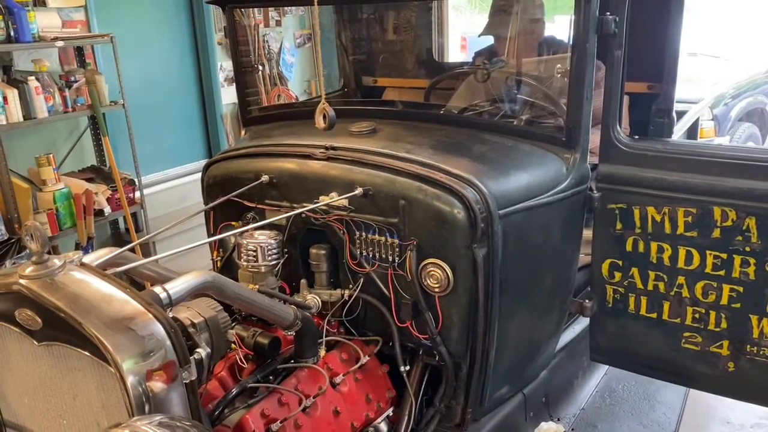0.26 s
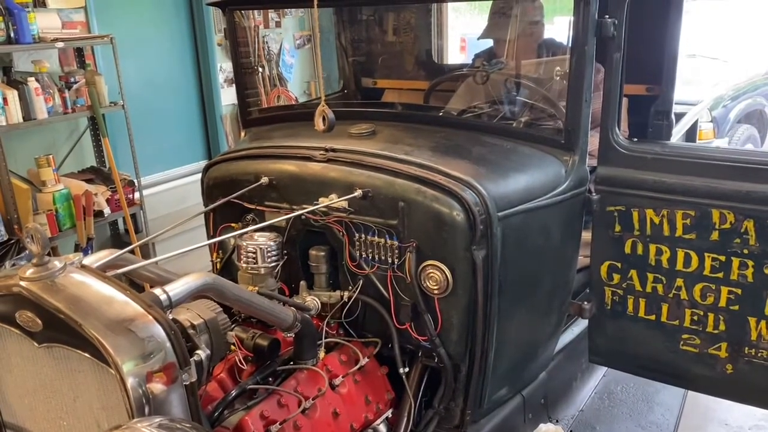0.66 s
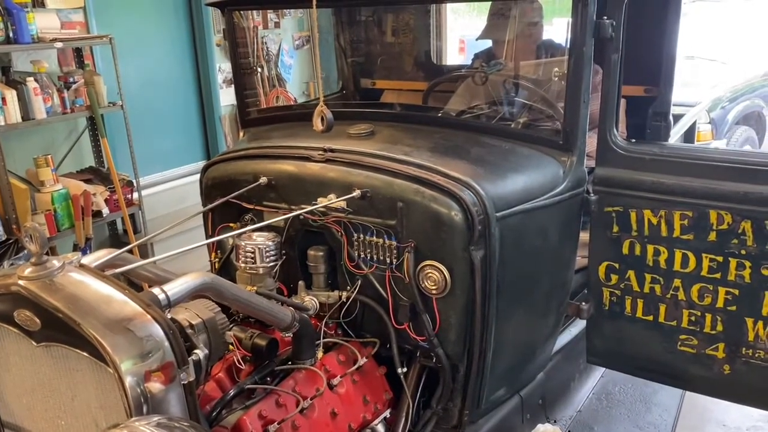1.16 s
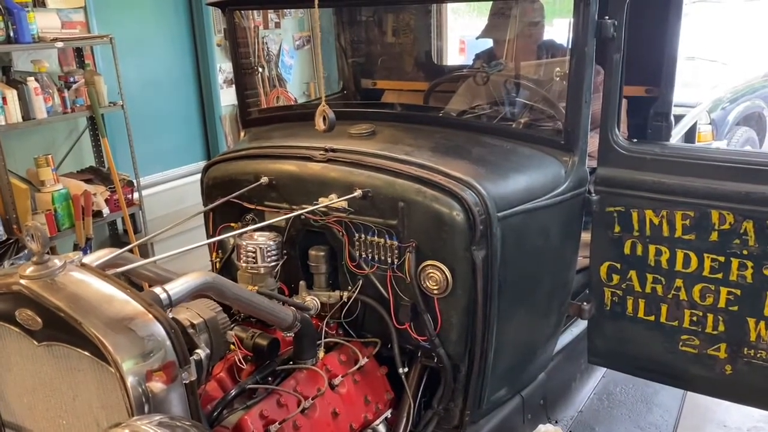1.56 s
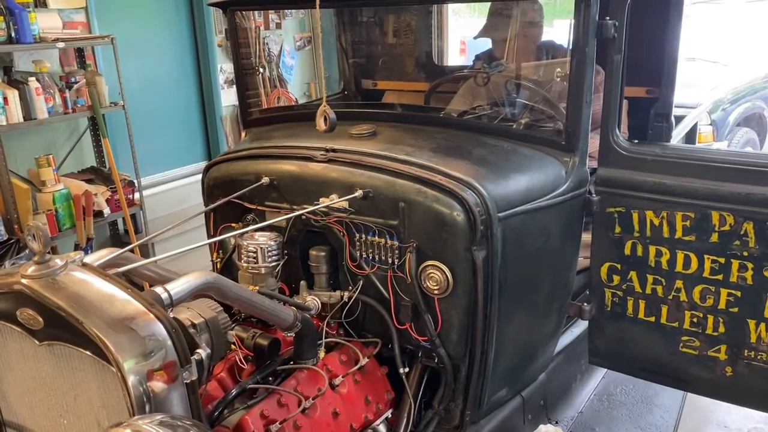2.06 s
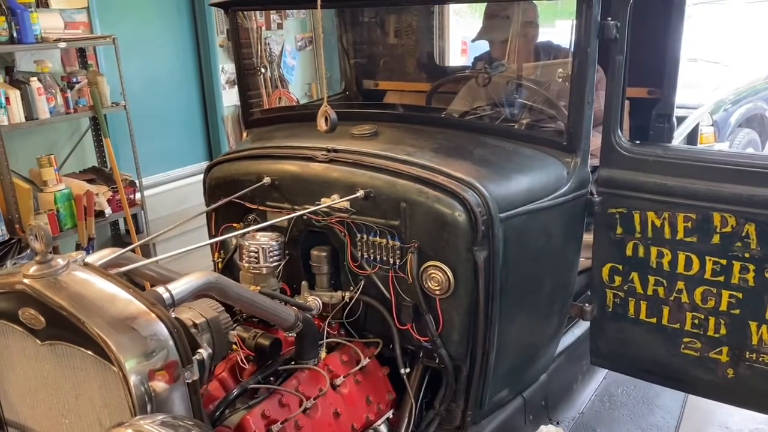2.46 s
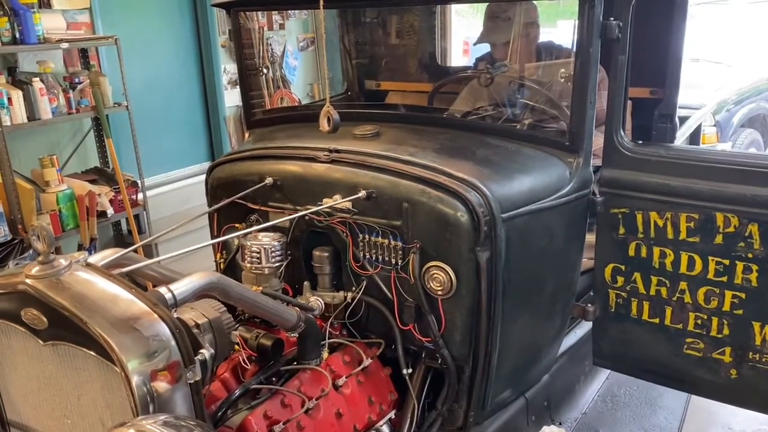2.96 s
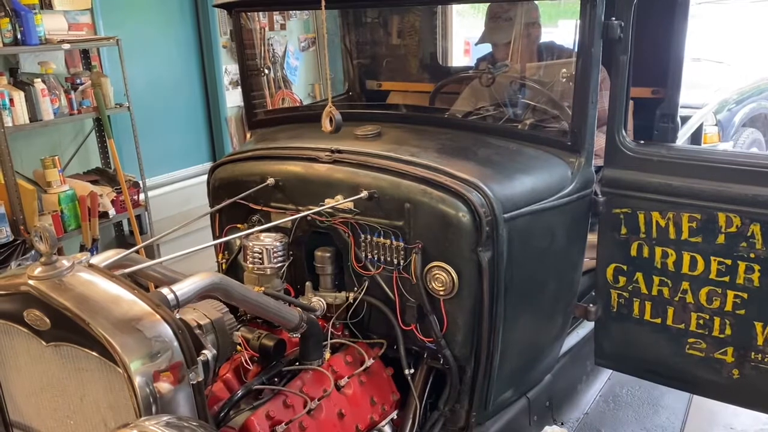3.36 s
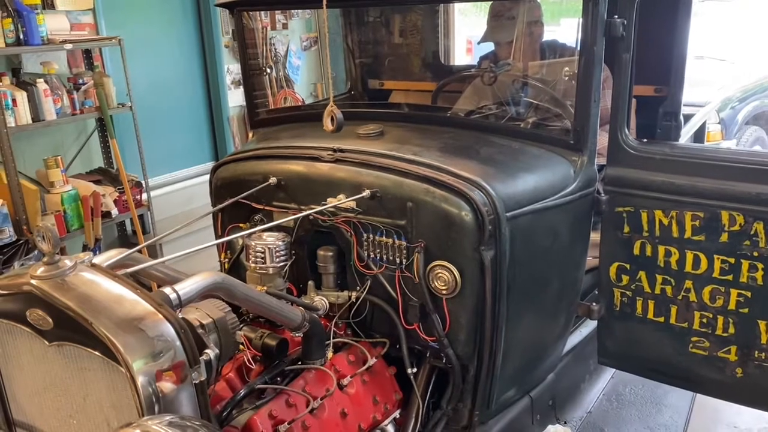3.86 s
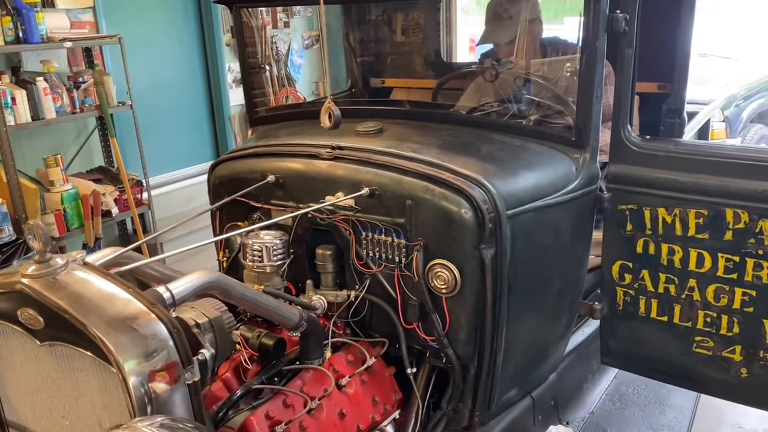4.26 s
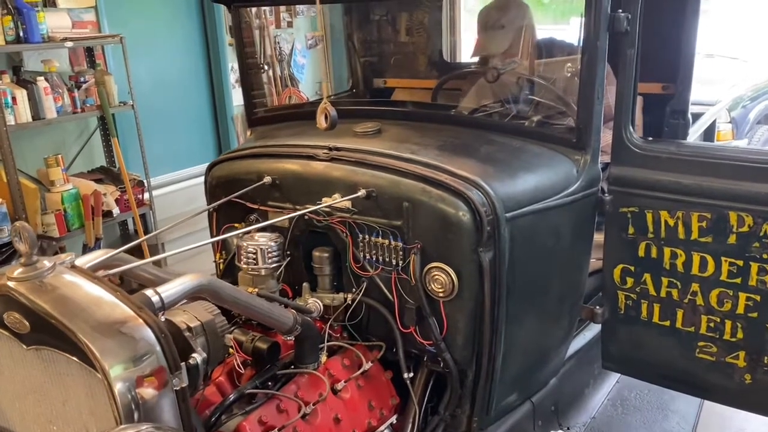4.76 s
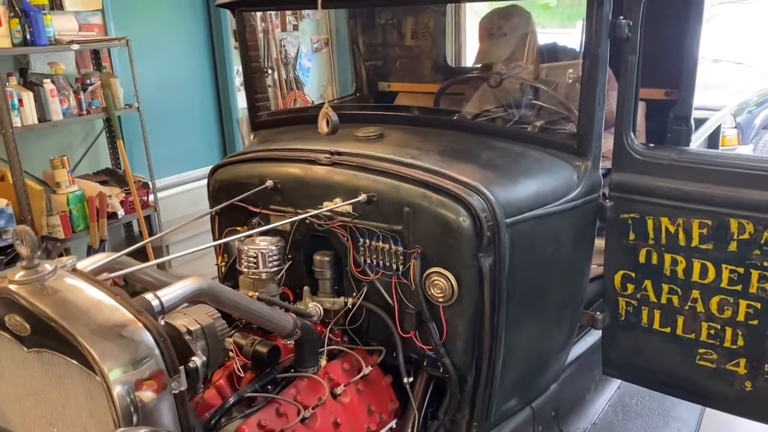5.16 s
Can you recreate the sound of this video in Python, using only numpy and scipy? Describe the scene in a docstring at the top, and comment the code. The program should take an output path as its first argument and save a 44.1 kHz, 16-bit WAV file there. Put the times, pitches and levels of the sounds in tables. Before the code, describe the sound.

A quiet home garage with soft low rumble and a faint steady hum. From about 0.15 to 0.4 s, several tiny, high squeaks slip and fall in pitch. At 0.8 s controls in the old car's cab knock dully, a loose linkage scrapes briefly around 0.9-1.1 s, and a sharper click lands near 1.2 s. At 1.5 s the starter slams in with a metallic clang and grinds, growling, rattling and whining unevenly until nearly 2 s. The cold V8 catches abruptly, spitting sharply through the carburettor, then stumbles and sags until 2.8 s. Two throttle stabs follow, about 2.9 and 3.3 s, the second climbing higher with a full roar, rasp and intake hiss. Exhaust pops burst around 3.4-3.55 s; revs sink unevenly, with more pops near 4.9 s. It ends on a fast, loping idle, booming bass pulses and ticking tappets, close in stereo with short garage echo.

```python
"""A faint squeak comes first, then knocks and a short scrape from the controls in the cab of an old V8.
The starter slams in and grinds on the flywheel: its gear teeth are spikes that ring the metal housing.
The cold engine catches, spits, stumbles and takes two stabs of throttle, the second climbing higher.
Pops follow and it sinks to a fast idle that lopes. Exhaust pulses boom in the home garage and sound a note at
the firing rate; noise pulsing with them roars, rasps and hisses, tappets tick, and a room hum lasts throughout."""
import sys
import numpy as np
from scipy import signal
from scipy.fft import rfft, irfft, next_fast_len
from scipy.io import wavfile
from scipy.ndimage import uniform_filter1d, map_coordinates

SR = 44100
rng = np.random.default_rng(int(sys.argv[2]) if len(sys.argv) > 2 else 0)


def dump_mix(stems):
    """Bounce the given channels to the path in sys.argv[1] as a 16-bit WAV at rate SR."""
    frames = np.atleast_2d(stems).T  # one column per channel
    limited = np.clip(frames, -1, 1)  # hard clip at full scale
    pcm = np.round(limited * 32767).astype(np.int16)
    wavfile.write(sys.argv[1], SR, pcm)


N = 238250
TIME = np.arange(N) / SR  # seconds

# In every spectrum below, gain_db shapes the tone; the overall level is set where it is used.
# Room hum and thin hiss of an appliance
HUM_HZ, HUM_DB, FIZZ_DB = 362, -66.5, -75
# spectrum of the thin hiss: pitch_hz, gain_db
FIZZ_SPECTRUM = [(3900, -38), (4400, -11), (4680, 7), (4900, -16), (5200, -43)]
# spectrum of the quiet room's rumble: pitch_hz, gain_db
RUMBLE_SPECTRUM = [(20, -30), (45, 2.5), (90, 5), (160, -4.5), (270, -5.5), (400, -17), (560, -21.5),
                   (850, -12.5), (1700, -21.5), (3000, -36), (4700, -37), (7000, -72), (16000, -58)]

# knocks of the controls in the cab: start_s, click_db, thud_db, t60_s (time to fall by 60 dB)
CONTROLS = [(0.784, -49.5, -42.5, 0.22), (0.805, -76, -39, 0.43), (0.959, -82, -49.5, 0.63),
            (1.03, -81, -53, 0.27), (1.18, -43.5, -54, 0.19), (1.2, -74.5, -57, 0.79)]
# spectrum of the control clicks: pitch_hz, gain_db
SWITCH_SPECTRUM = [(200, -34), (1000, -10), (3000, -16), (4500, 0.5), (7200, 7), (8500, 2), (11000, -9),
                   (16000, -14)]
# spectrum of the control thuds: pitch_hz, gain_db
THUD_SPECTRUM = [(30, -16), (80, -2), (160, 3), (400, -4), (1000, -11), (3000, -16.5), (9000, -40.5)]
# spectrum of the sliding linkage: pitch_hz, gain_db
SLIDE_SPECTRUM = [(500, -6), (1100, -5), (1800, -5), (2500, 4), (3500, -10), (5000, -15), (9000, -37)]
SLIDE_S, SLIDE_RISE_S, SLIDE_HOLD_S, SLIDE_FALL_S, SLIDE_DB = 0.9, 0.035, 0.079, 0.074, -60

# slips of the squeak: start_s, pitch_hz (at the start), level_db (before a trim), t60_s
SQUEAKS = [(0.15, 2130, -68, .18), (0.183, 2270, -59, 0.12), (0.281, 2254, -61, .12),
           (0.358, 2274, -53.5, 0.1), (0.395, 2230, -66, 0.22)]
SQUEAK_SAG_HZ, SQUEAK_SAG_S = 70, 0.03  # how far each slip falls in pitch, and the time constant

# the starter, slowed by each compression: time_s, tooth_rate_hz, growl_db, rattle_db, whine_db
CRANKING = [(1.487, 624, -27, -27, -42), (1.525, 720, -23.5, -29, -34), (1.545, 884, -15.5, -35, -18),
            (1.585, 860, -20, -27, -33), (1.62, 920, -20.5, -24.5, -20), (1.668, 915, -22.5, -18.5, -40),
            (1.703, 830, -18, -33, -49), (1.725, 880, -23.5, -23, -22), (1.792, 955, -17.5, -24, -27),
            (1.815, 970, -21.5, -24.5, -43), (1.86, 830, -23.5, -27.5, -17), (1.882, 840, -28, -32, -35),
            (1.98, 800, -55, -62, -56)]
# pinion blows on the flywheel: start_s, peak_db, clang_db and thump_db (against the peak, before trims)
PINION = [(1.486, -20.5, -10, -2), (1.532, -23, 16, -0.5), (1.721, -21.5, -3, -22), (1.759, -26, 8, -25),
          (1.854, -31, 14, -18)]
# whine partials: multiple of the tooth rate, level_db (against the whine)
GEAR_WHINE = [(1, 4), (2, -10), (3, -20)]
# partials under load: multiple of a quarter of the tooth rate, level_db
GROWL_TONES = [(2, -3), (3, -0.5), (4, -6), (6, -2.5)]
# partials off load: multiple of a quarter of the tooth rate, level_db
RATTLE_TONES = [(6, -4), (7, -5), (8, -2), (9, 0), (10, -11), (11, -11)]
TEETH_PER_ORDER = 4
# spectrum of the gears grinding under load: pitch_hz, gain_db
GRIND_SPECTRUM = [(100, -18), (200, -7.5), (350, -23), (470, -8), (680, -4), (900, -12.5), (1100, -4.5),
                  (1800, -14.5), (2400, -20), (3900, -39), (8000, -42), (10000, -69)]
# spectrum of the gears rattling off load: pitch_hz, gain_db
RATTLE_SPECTRUM = [(600, -40), (1100, -7), (1350, -3), (1750, 8.5), (2100, 1.5), (2500, 1), (3600, -2),
                   (4300, -27), (7500, -29), (10000, -39)]
# spectrum of the pinion's clang: pitch_hz, gain_db
CLANG_SPECTRUM = [(100, -21), (220, -2.5), (450, -1.5), (680, 4), (860, 2), (1080, -10.5), (1330, -2),
                  (1900, -10.5), (2400, -11.5), (3900, -26.5), (8000, -18.5), (10000, -67)]
# spectrum of the pinion's sharp crack: pitch_hz, gain_db
CRACK_SPECTRUM = [(200, -14), (1000, 3), (3500, 3), (7000, 0.5), (10000, -2), (16000, -3.5)]
# ringing modes of the starter housing: pitch_hz, lift_db (scaled by the filter's depth)
HOUSING = [(306, 4), (353, 10), (456, 13), (580, 1.6667), (638, 11), (676, 7.5), (855, 12), (911, 3),
           (942, 13.6), (993, 7.3), (1274, 13), (1537, 3.3), (1640, 14.7), (1807, 13), (1960, 4),
           (2052, 9.1), (2270, 5), (2409, 9.7), (2868, 4)]

# carburettor spits: start_s, peak_db (before a trim)
SPITS = [(1.9121, -23.5), (1.9604, -21.5), (1.985, -24), (2.085, -17), (2.1246, -20.5)]
# spectrum of a spit: pitch_hz, gain_db
SPIT_SPECTRUM = [(1500, -36), (4000, -11), (5000, 2.5), (7500, -2), (10000, -17), (16000, -13)]
# exhaust pops: start_s, level_db, t60_s
POPS = [(2.985, -43, 0.18), (3.075, -27, 0.19), (3.411, -20, 0.088), (3.484, -16.5, 0.18),
        (3.546, -12.5, 0.23), (4.253, -44, 0.17), (4.878, -19, 0.2), (4.908, -24.5, 0.32)]
# spectrum of a pop, also used for soft bumps and thumps: pitch_hz, gain_db
POP_SPECTRUM = [(100, -12), (240, 1), (450, 4), (900, -9), (1400, -21), (5000, -44)]
# spectrum of a pop's sharp front: pitch_hz, gain_db
POP_FRONT = [(150, -25), (450, 0), (680, -2.5), (860, 1), (1100, -8), (2000, -25), (5000, -55)]
FRONT_DB, FRONT_T60_S = -5, 0.09  # the front's level against the pop, and its length

# crankshaft speed: time_s, firing_rate_hz
SPEED = [(1.5, 18), (1.8, 44), (1.95, 70), (2.08, 72), (2.2, 62), (2.38, 67), (2.56, 52), (2.72, 48),
         (2.86, 49), (3.0, 66), (3.16, 88), (3.33, 92), (3.45, 97), (3.6, 103), (3.72, 97), (3.8, 95),
         (4.05, 91), (4.35, 79), (4.6, 74.5), (4.82, 72.5), (5.0, 68), (5.4, 67.5)]
# pedal movements that together shape two stabs of throttle: start_s, rise_s, hold_s, opening (0-1)
THROTTLE = [(2.852, 0.12, 0.1, 0.6), (3.092, 0.046, 0.069, 0.3), (3.274, 0.16, 0.083, 0.77),
            (3.442, 0.051, .04, 0.72)]
# extra strength of each pulse, in firing order: strength (scaled by pattern and unevenness)
CYLINDERS = [0.1, -0.38, 0.052, -0.05, -0.53, -0.17, 0.083, -0.83]
# missed or changed firings: time_s, drop_db (negative is a lift; scaled by each sound's share)
MISSES = [(1.973, 12), (2.03, 12), (2.1, 12), (2.222, 2), (2.29, 5), (2.405, 6), (2.475, -4), (2.64, 3),
          (2.773, 6), (2.82, 6)]
MISS_S = 0.016  # half width of each such change
CLOSE_S = 0.2  # time constant of the closing throttle
IDLE_RATE = 71.6  # firings a second at which the level laws add nothing for speed
CRANK_S, CATCH_S, CATCH_RISE_DB = 1.487, 2.01, 11  # starter engages, engine catches, exhaust build-up
UNEVEN, OVERRUN_UNEVEN, OVERRUN_S = 0.44, 0.35, 0.91  # spread; extra once the pedal lifts; time constant
SETTLE_S = 4.5  # the idle begins to lope
BOOM_LOPE, BARK_LOPE = (5.45, 1.7), (5.335, 2.9)  # time_s of a weak moment, swing_db either way

# level law of the tappets: idle_db, full_throttle_added_db, added_db per doubling of speed
CLATTER_LAW = (-37.5, 4.5, 5.4)
# ringing of the valve gear and its covers: pitch_hz, level_db (against each other)
VALVE_MODES = [(1637, -47), (1900, -52.5), (2632, -51), (3079, -59), (3359, -52.5), (4883, -53),
               (5141, -68), (5674, -73), (6810, -62)]
# spectrum of a tappet's contact: pitch_hz, gain_db
TICK_SPECTRUM = [(700, -30), (1600, 7.5), (2600, -2), (3400, 3), (5000, -3), (7500, -7.5), (16000, -11)]
CLATTER_T60_S = 0.063  # how long each tick rings
TICK_DB, TICK_T60_S = 1, 0.013  # the dry contact's level against the ringing, and its length

# level law of the roar: idle_db, full_throttle_added_db, added_db per doubling of speed
ROAR_LAW = (-37, 17.8, 2.1)
# level law of the rasp: idle_db, full_throttle_added_db, added_db per doubling of speed
RASP_LAW = (-32, 9.1, 3.3)
# level law of the hiss: idle_db, full_throttle_added_db, added_db per doubling of speed
HISS_LAW = (-35.5, 12.6, 3.2)
# spectrum of the roar: pitch_hz, gain_db
ROAR_SPECTRUM = [(120, -65), (260, -2), (325, 2.5), (400, -1), (460, 0), (540, -6.5), (680, -3.5),
                 (800, -11.5), (1100, -11.5), (3000, -83.5)]
# spectrum of the combustion rasp: pitch_hz, gain_db
RASP_SPECTRUM = [(300, -41), (600, 0.5), (850, 3), (1100, 4), (1600, 5.5), (2100, 2.5), (2700, -1.5),
                 (3500, -1.5), (5000, -10), (16000, -58)]
# spectrum of the intake hiss: pitch_hz, gain_db
HISS_SPECTRUM = [(1200, -11), (2800, -12.5), (3500, -5.5), (4000, -5), (4700, 3), (5700, 0.5), (7300, 1.5),
                 (9000, -0.5), (12000, -5), (16000, -9)]
# modes of the room and engine bay: pitch_hz, lift_db (scaled by the filter's depth)
GARAGE_MODES = [(139, 1), (197, 1), (242, 10), (284, 3), (322, 3.5), (375, 1), (394, -4.5), (454, 5.5),
                (515, 7.5), (557, -2.5), (579, 4), (623, -4), (720, 0.5), (738, 0.5), (857, 9.5), (938, 7),
                (1015, 5.5), (1052, -16), (1284, -10), (1642, 36)]
COLD_DB, WARM_S = 9, 2.55  # extra roar of the first, rich firings, and the time it takes to fade
CHOKE_DB, CHOKE_OFF_S, CHOKE_FADE_S = 1, 3.5, 0.21  # the choked carburettor sucks louder at first

# clean notes of the exhaust: time_s, firing_note_db, stutter_note_db
DRONE = [(1.83, -47, -60), (1.94, -17, -40), (2.04, -16, -37), (2.12, -32, -27), (2.18, -31, -15),
         (2.26, -20, -24), (2.35, -16, -35), (2.46, -24, -45), (2.62, -22, -50), (2.86, -18.5, -50),
         (2.99, -14, -45), (3.09, -24, -30), (3.18, -13.5, -35), (3.32, -16, -35), (3.45, -15.5, -32),
         (3.5, -25, -23), (3.6, -30, -15), (3.7, -27, -16.5), (3.9, -29, -28), (4.1, -22.5, -24),
         (4.28, -33, -34), (4.52, -29, -32), (4.62, -17, -36), (4.81, -17.5, -37), (4.88, -27.5, -40),
         (5.05, -23.5, -40), (5.39, -22, -40)]
STUTTER_ORDER = 3 / 4  # pitch of the stutter note against the firing rate
# exhaust pulses: time_s, boom_db and bark_db (before small trims), boom_unevenness (0-1)
EXHAUST = [(1.8, -24, -40, .5), (1.84, -26, -42, 0.54), (1.93, -14.5, -23, 0.44), (2.06, -20, -23.5, 0.53),
           (2.17, -16, -23.5, 0.48), (2.33, -16, -23.5, 0.46), (2.54, -21, -32, 0.55),
           (2.72, -15, -27, 0.55), (2.84, -18, -22, 0.8), (2.9, -24, -26.5, .4), (2.97, -22, -16.5, 0.46),
           (3.12, -11, -15, 0.53), (3.24, -19, -16.5, .4), (3.42, -21.5, -15, 0.47), (3.6, -20, -15, 0.65),
           (3.72, -14.5, -24.5, 0.86), (4.0, -24, -20, 0.5), (4.45, -18, -22, 0.8),
           (4.62, -22.5, -24, 0.77), (4.8, -23, -24.5, 0.6), (4.86, -22, -19.5, 0.7),
           (5.0, -23.5, -24.5, 0.57), (5.38, -22, -25.5, 0.57)]
# spectrum of the boom: pitch_hz, gain_db
BOOM_SPECTRUM = [(20, -41.5), (33, -23), (44, 3.5), (57, 2.5), (72, 6), (95, 2), (115, -7), (140, -4),
                 (175, -15), (400, -100)]
# standing waves between the walls: pitch_hz, lift_db
STANDING = [(47, 7.5), (74, 3.5)]
# spectrum of the bark: pitch_hz, gain_db
BARK_SPECTRUM = [(50, -83), (95, -5.5), (122, 1), (145, 7.5), (172, 0.5), (198, 3), (260, 2), (300, -2),
                 (335, -3.5), (390, -11.5), (600, -18), (1200, -61), (4000, -43)]
# narrow resonances of pipes and room: pitch_hz, lift_db
PIPES = [(139, 1.5), (197, 7.5), (242, 8.5), (282, 7), (322, 4), (339, 4.5), (454, 8.5), (557, -1)]

# length of the garage's echo: pitch_hz, t60_s
ECHO = [(100, 0.56), (500, 0.5), (3000, 0.68), (8000, 0.11), (16000, 0.13)]
# reflections at the sides: pitch_hz, side_db
WIDTH = [(40, -23.5), (80, -15.5), (170, -15), (350, -10), (700, -6.5), (1300, -2), (2600, -6.5),
         (5200, -5), (7000, -11), (16000, -101)]
# left against right level: pitch_hz, difference_db
LEFT_RIGHT = [(60, 0.5), (110, 0.5), (200, -2), (380, -1.5), (700, 0.5), (1290, -1.5), (2380, 1.5),
              (4400, 3), (8120, 0), (15000, 0)]
# how far the left channel's phase leads: pitch_hz, lead in half cycles
LEFT_LEAD = [(700, 0), (1400, .33), (1850, .35), (2100, 0), (3200, .12), (5200, .1), (6000, 0), (7500, 0),
             (8400, -1), (9600, -1), (10400, -2), (11800, -2), (12500, -3), (13900, -3), (14600, -4)]
TOP_HZ = 15900  # nothing is left above this


def amp(db):
    """Decibels to gain."""
    return 10 ** (np.asarray(db) / 20)


def unit(x):
    """Scale to rms 1."""
    return x / np.sqrt(np.mean(x ** 2) + 1e-20)


def along(points, hz):
    """Read a curve of (Hz, value) points on a log pitch axis."""
    f, v = np.transpose(points)
    return np.interp(np.log(hz + 1), np.log(f + 1), v)


def curves(rows):
    """One value per sample for each column after the time."""
    s, *cols = np.transpose(rows)
    return [np.interp(TIME, s, c) for c in cols]


def fade(start, length):
    """A ramp from 0 to 1."""
    return np.clip((TIME - start) / length, 0, 1)


def since(start):
    """Seconds gone by since a moment, 0 before it."""
    return np.maximum(TIME - start, 0)


def wobble(rate):
    """A smooth random curve with rate knots a second; it loops after 1200 knots."""
    return map_coordinates(rng.standard_normal(1200), [TIME * rate], mode="wrap")


def colour(x, points, modes=(), width_hz=8, depth=1):
    """Filter with a broad spectrum lifted by narrow ringing modes; nothing sounds before its cause."""
    size = 2 * next_fast_len(N // 2 + SR // 4)
    hz = np.fft.rfftfreq(size, 1 / SR)
    db = along(points, hz)
    db = db + sum(depth * lift / (1 + ((hz - f) / width_hz) ** 2) for f, lift in modes)
    # folding the cepstrum onto its first half gives the minimum-phase filter
    cepstrum = irfft(np.log(amp(db)))
    cepstrum[1:size // 2] *= 2
    cepstrum[size // 2 + 1:] = 0
    return irfft(rfft(x, size) * np.exp(rfft(cepstrum)))[..., :N]


def steady(x, span):
    """Even out a stereo sound: its middle comes near rms 1 over about span seconds."""
    power = np.mean(x, 0) ** 2
    for _ in range(2):
        power = np.abs(uniform_filter1d(power, int(span * SR)))
    return x / np.sqrt(power + np.mean(power) / 1000)  # the floor keeps silence quiet


def garage(x, wet_db):
    """Direct sound and a diffuse tail in the middle; reflections from the walls at the sides."""
    hz, t, z = signal.stft(rng.standard_normal((2, SR // 2)), SR, nperseg=256)
    t60 = along(ECHO, hz)[:, None]
    z = z * amp(-60 * t / t60) / np.sqrt(t60)
    tails = signal.istft(z, SR, nperseg=256)[1]
    tails /= np.linalg.norm(tails, axis=1, keepdims=True)
    late, side = signal.fftconvolve(x[None], tails, axes=1)[:, :N]
    mid = (x + amp(wet_db) * late) / np.hypot(1, amp(wet_db))
    side = colour(side, WIDTH)
    return np.array([mid + side, mid - side])


def noise(points):
    """Coloured noise of rms 1."""
    return unit(colour(rng.standard_normal(N), points))


def blows(rows, t60):
    """Envelope of sudden blows (s, dB) that die away."""
    return sum(amp(db - 60 * since(s) / t60) * fade(s, .001) for s, db in rows)


def impulses(times, sizes):
    """One spike for each time."""
    return np.bincount(np.clip(times * SR, 0, N - 1).astype(int), sizes, N)


def ring_down(x, t60):
    """Each spike becomes a decaying envelope."""
    return signal.lfilter([1], [1, -amp(-60 / (t60 * SR))], x)


def firings(turn, spread, pattern, scatter, jitter):
    """One spike per whole turn count; strength follows a cylinder pattern plus chance, timing jitters."""
    at = np.flatnonzero(np.diff(np.floor(turn)) > 0)
    uneven = spread[at]
    chance = rng.standard_normal((len(at), 2))
    sizes = 1 + uneven * (pattern * np.resize(CYLINDERS, len(at)) + scatter * chance[:, 0])
    return impulses(at / SR + jitter * uneven * chance[:, 1], sizes)


def throttle():
    """Each pedal movement opens, holds and lets fall; the widest opening counts, which makes two stabs."""
    movements = [opening * fade(s, rise) * np.exp(-since(s + rise + hold) / CLOSE_S)
                 for s, rise, hold, opening in THROTTLE]
    return np.max(movements, 0)


def effort(law):
    """Gain of a sound that grows with throttle and, once the engine runs, with speed."""
    idle_db, throttle_db, doubling_db = law
    doublings = np.log2(curves(SPEED)[0] / IDLE_RATE) * fade(CATCH_S, 0.082)
    return amp(idle_db + throttle_db * throttle() + doubling_db * doublings)


def stumble():
    """Unevenness of the firings: greatest just after the pedal lifts from the second stab."""
    s, rise, hold, _ = THROTTLE[-1]
    lift = s + rise + hold
    return UNEVEN + OVERRUN_UNEVEN * (TIME > lift) * np.exp(-since(lift) / OVERRUN_S)


def missed(share):
    """Gain that changes briefly, mostly dipping, at each listed firing."""
    drop_db = sum(db * np.exp(-((TIME - s) / MISS_S) ** 2) for s, db in MISSES)
    return amp(-share * drop_db)


def lope(turn, weak_s, depth_db):
    """As the engine settles, its level rocks once in each round of the cylinders."""
    rounds = (turn - np.interp(weak_s, TIME, turn)) / len(CYLINDERS)
    return amp(-depth_db * fade(SETTLE_S, 0.35) * np.cos(2 * np.pi * rounds))


def room_tone():
    """Wavering low rumble as filtered noise; an appliance adds a drifting sine hum and a thin hiss."""
    drift = 0.0018 * np.cumsum(wobble(170)) / SR
    hum = amp(HUM_DB) * np.sqrt(2) * np.sin(2 * np.pi * HUM_HZ * (TIME + drift))
    rumble = amp(-56 + 1.6 * wobble(6.55)) * noise(RUMBLE_SPECTRUM)
    fizz = amp(FIZZ_DB) * noise(FIZZ_SPECTRUM)
    return garage(rumble + fizz, wet_db=-7) + hum


def cab():
    """Controls click and thud as bursts of noise; their loose linkage scrapes roughly as it slides."""
    clicks = sum(blows([(s, db)], t60) for s, db, _, t60 in CONTROLS) * noise(SWITCH_SPECTRUM)
    thuds = sum(blows([(s, db)], t60) for s, _, db, t60 in CONTROLS) * noise(THUD_SPECTRUM)
    thuds = thuds * unit(amp(2.0 * wobble(170)))
    fall_s = SLIDE_S + SLIDE_RISE_S + SLIDE_HOLD_S
    stroke = fade(SLIDE_S, SLIDE_RISE_S) * (1 - fade(fall_s, SLIDE_FALL_S))
    scrape = amp(SLIDE_DB) * stroke * unit(noise(SLIDE_SPECTRUM) * amp(3.5 * wobble(200)))
    return garage(clicks + thuds + scrape, wet_db=-5)


def squeak():
    """Each slip is a short, rough, falling tone with a soft bump beneath it; the room holds the tone."""
    tones = 0
    for s, hz, db, t60 in SQUEAKS:
        sag = SQUEAK_SAG_HZ * (1 - np.exp(-since(s) / SQUEAK_SAG_S))
        pitch = hz - sag + 70 * wobble(600)
        tone = np.sin(2 * np.pi * np.cumsum(pitch) / SR)
        tones = tones + blows([(s, db)], t60) * fade(s, 0.004) * tone
    bumps = blows([(s, db) for s, _, db, _ in SQUEAKS], t60=0.29) * noise(POP_SPECTRUM)
    return garage(amp(6) * tones + amp(-2.5) * bumps, wet_db=-4)


def gear_tones(gear, orders):
    """Wavering partials that glide with the starter's speed."""
    tones = 0
    for k, db in orders:
        cycles = k * gear / TEETH_PER_ORDER + 0.12 * wobble(90)
        tones = tones + amp(db + 5.1 * wobble(70)) * np.sin(2 * np.pi * cycles)
    return steady(garage(tones, wet_db=-8), span=0.04)


def gear_grind():
    """Tooth strikes ring the housing: they growl and whine under compression and rattle off load."""
    tooth_hz, growl_db, rattle_db, whine_db = curves(CRANKING)
    gear = np.cumsum(tooth_hz * (1 + .025 * wobble(260))) / SR  # teeth passed so far
    teeth = np.flatnonzero(np.diff(np.floor(gear)) > 0)
    chance = rng.standard_normal((len(teeth), 2))
    strikes = impulses(teeth / SR + 0.00016 * chance[:, 0], amp(3.6 * chance[:, 1]))
    # the pinion chatters in its backlash
    drive = (unit(strikes) + 0.37 * rng.standard_normal(N)) * amp(1.7 * wobble(170))
    growl = garage(colour(drive, GRIND_SPECTRUM, HOUSING, width_hz=7.8), wet_db=-2)
    growl = amp(-0.5) * steady(growl, span=0.035) + amp(-6.5) * gear_tones(gear, GROWL_TONES)
    rattle = garage(colour(drive, RATTLE_SPECTRUM, HOUSING, width_hz=17), wet_db=2)
    rattle = amp(-1.5) * steady(rattle, span=0.045) + amp(-7) * gear_tones(gear, RATTLE_TONES)
    whine = sum(amp(db + 3.9 * wobble(110)) * np.sin(2 * np.pi * k * gear) for k, db in GEAR_WHINE)
    whine = steady(garage(whine, wet_db=-7), span=0.033)
    grind = amp(growl_db) * growl + amp(rattle_db) * rattle + amp(whine_db) * whine
    return grind * fade(CRANK_S, 0.0085) * (TIME < CRANKING[-1][0])


def pinion_blows():
    """The pinion slams in and kicks as cylinders fire: noise bursts clang, crack and thump."""
    slams = blows([(s, db + clang_db) for s, db, clang_db, _ in PINION], t60=0.13)
    slams = slams * rng.standard_normal(N)
    clang = amp(10.5) * colour(slams, CLANG_SPECTRUM, HOUSING, width_hz=14.5, depth=0.5)
    crack = amp(1.0) * blows([row[:2] for row in PINION], t60=0.11) * noise(CRACK_SPECTRUM)
    thump = blows([(s, db + thump_db) for s, db, _, thump_db in PINION], t60=0.29)
    thump = thump * noise(POP_SPECTRUM)
    return garage(clang + crack + thump, wet_db=-3.0)


def starter():
    """The turning gears and the blows of the pinion together."""
    return gear_grind() + pinion_blows()


def misfires():
    """Bursts of coloured noise: spits through the carburettor and sharp-fronted exhaust pops."""
    spits = amp(-2.5) * blows(SPITS, t60=0.074) * noise(SPIT_SPECTRUM)
    pops = sum(blows([(s, db)], t60) for s, db, t60 in POPS) * noise(POP_SPECTRUM)
    fronts = amp(FRONT_DB) * blows([row[:2] for row in POPS], FRONT_T60_S) * noise(POP_FRONT)
    return garage(spits + pops + fronts, wet_db=-6.0)


def clatter(turn):
    """Loose tappets tick unevenly: each dry contact rings the valve gear with its own mix of modes."""
    ticks = np.abs(firings(2 * turn, stumble(), pattern=0.8, scatter=0.9, jitter=.0014))
    t = np.arange(SR // 10) / SR
    decay = amp(-60 * t / CLATTER_T60_S)
    ring = 0
    for hz, db in VALVE_MODES:
        mode = decay * np.sin(2 * np.pi * hz * t)
        ring = ring + amp(db) * signal.fftconvolve(ticks * rng.standard_normal(N), mode)[:N]
    contact = colour(ring_down(ticks, TICK_T60_S) * rng.standard_normal(N), TICK_SPECTRUM)
    mixed = garage(unit(ring) + amp(TICK_DB) * unit(contact), wet_db=-10.5)
    return fade(CATCH_S, 0.14) * effort(CLATTER_LAW) * steady(mixed, span=0.21)


def engine_bay(turn):
    """Noise for roar, rasp and intake hiss throbs with the firings; tappets tick twice as often."""
    pulses = firings(turn, stumble(), pattern=0.54, scatter=1, jitter=.0015)
    throb = unit(ring_down(np.abs(pulses), t60=0.082))
    tappets = unit(firings(2 * turn, stumble(), pattern=0.24, scatter=0.93, jitter=.0006))
    roar = (0.66 + throb) * rng.standard_normal(N) + 0.62 * unit(pulses)
    roar = garage(colour(roar, ROAR_SPECTRUM, GARAGE_MODES, width_hz=10.0, depth=0.96), wet_db=3.0)
    rasp = (0.16 + throb) * rng.standard_normal(N) + 0.22 * tappets
    rasp = garage(colour(rasp, RASP_SPECTRUM, GARAGE_MODES, width_hz=3.4, depth=0.2), wet_db=2.0)
    hiss = (0.85 + throb) * rng.standard_normal(N) + 0.098 * tappets
    hiss = garage(colour(hiss, HISS_SPECTRUM), wet_db=-5.5)
    cold = amp(COLD_DB * (1 - fade(CATCH_S, WARM_S)))
    choke = amp(CHOKE_DB * (1 - fade(CHOKE_OFF_S, CHOKE_FADE_S)))
    roar = cold * effort(ROAR_LAW) * steady(roar, span=0.21)
    rasp = effort(RASP_LAW) * steady(rasp, span=0.076)
    burning = fade(1.746, 0.25) * missed(share=0.19) * (roar + rasp)
    intake = choke * effort(HISS_LAW) * fade(CRANK_S, 0.0023) * steady(hiss, span=0.31)
    return burning + intake


def drone(turn):
    """Pipes sound a note at the firing rate and a lower one when cylinders drop out; both shake a little."""
    firing_db, stutter_db = curves(DRONE)
    phase = 2 * np.pi * (turn + 0.035 * wobble(35))
    note = np.sin(phase) + amp(-10.5) * np.sin(2 * phase) + amp(-16.5) * np.sin(3 * phase)
    note = amp(firing_db + 1.6 * wobble(45)) * note
    stutter = amp(stutter_db + 1.5 * wobble(29.83)) * np.sin(STUTTER_ORDER * phase)
    both = garage(np.sqrt(2) * (note + stutter), wet_db=-19)
    return both * missed(share=1.0) * lope(turn, *BOOM_LOPE)


def exhaust(turn):
    """Pulses boom in the lowest room modes and bark in the pipes; throttle adds turbulent gas to the bark."""
    boom_db, bark_db, spread = curves(EXHAUST)
    boom = firings(turn, spread, pattern=3.6, scatter=1.24, jitter=0.0031)
    boom = garage(colour(boom, BOOM_SPECTRUM, STANDING, width_hz=3.7), wet_db=4)
    pulses = firings(turn, stumble(), pattern=0.92, scatter=0.81, jitter=.0019)
    gas = ring_down(np.abs(pulses), t60=0.075) * rng.standard_normal(N)
    gas = gas * (0.042 + 0.043 * throttle())
    bark = garage(colour(pulses + gas, BARK_SPECTRUM, PIPES, width_hz=5.7), wet_db=-6.5)
    build_up = amp(CATCH_RISE_DB * (fade(CRANK_S, CATCH_S - CRANK_S) - 1))
    running = fade(CRANK_S, .02) * build_up
    boom = amp(boom_db - 0.7) * steady(boom, span=0.077) * missed(share=1.0) * lope(turn, *BOOM_LOPE)
    bark = amp(bark_db + 0.7) * steady(bark, span=0.082) * missed(share=0.21) * lope(turn, *BARK_LOPE)
    return running * (boom + bark)


def scene():
    """Add the layers; one count of firings times the running engine, the starter keeps its own."""
    turn = np.cumsum(curves(SPEED)[0] * fade(CRANK_S, .01)) / SR  # firings so far
    background = room_tone() + cab() + squeak()
    starting = starter() + misfires()
    return background + starting + clatter(turn) + engine_bay(turn) + drone(turn) + exhaust(turn)


def record(dry):
    """Left and right differ in colour and phase; the loudest peaks are rounded and the top is cut off."""
    size = next_fast_len(N + SR // 4)
    hz = np.fft.rfftfreq(size, 1 / SR)
    halves = [.5, -.5]  # each channel takes half of the difference
    level = amp(np.outer(halves, along(LEFT_RIGHT, hz)))
    phase = np.exp(1j * np.pi * np.outer(halves, along(LEFT_LEAD, hz)))
    heard = irfft(rfft(dry, size) * level * phase, size)
    rounded = heard / (1 + np.abs(heard / .93) ** 6) ** (1 / 6)
    passed = np.clip((TOP_HZ - hz) / 200, 0, 1)
    return irfft(rfft(rounded) * passed, size)[:, :N]


dry = scene()
out = record(dry)
dump_mix(out)
```